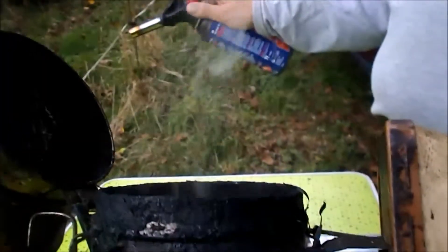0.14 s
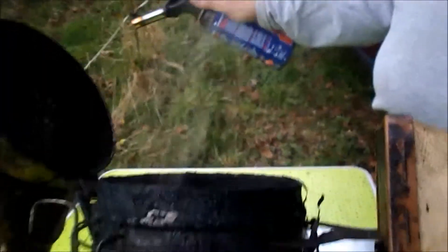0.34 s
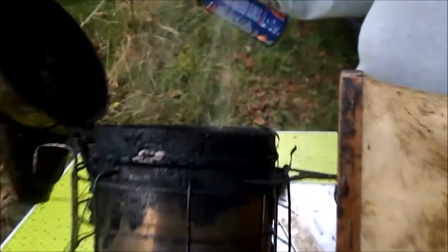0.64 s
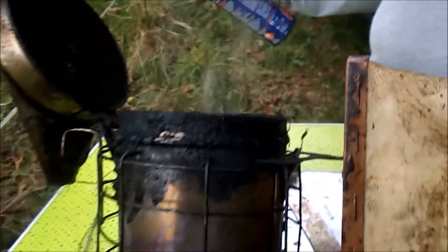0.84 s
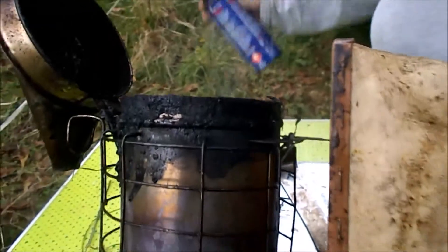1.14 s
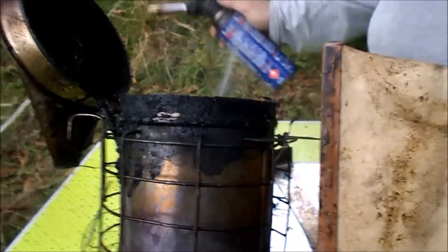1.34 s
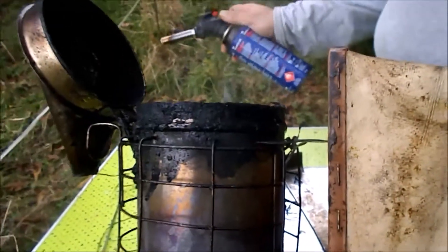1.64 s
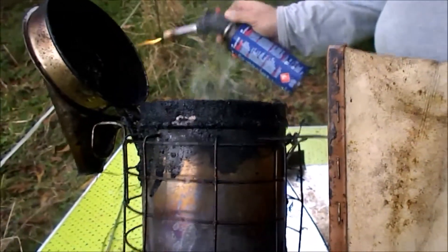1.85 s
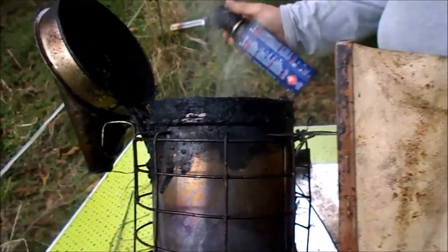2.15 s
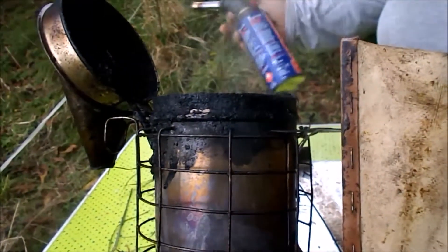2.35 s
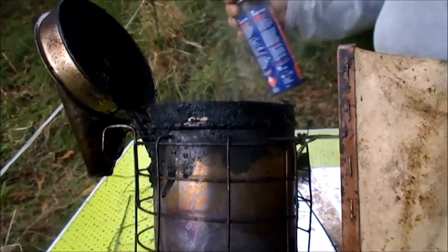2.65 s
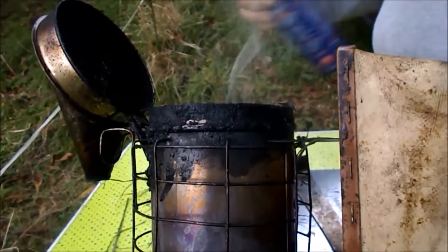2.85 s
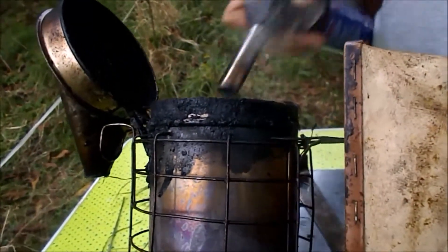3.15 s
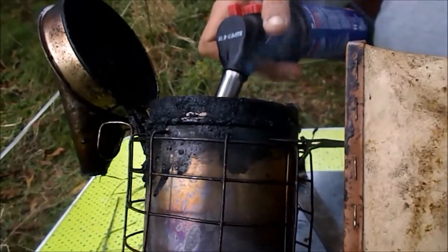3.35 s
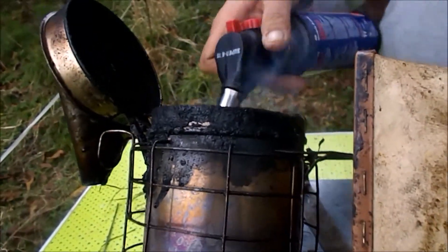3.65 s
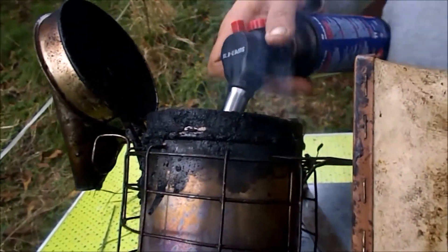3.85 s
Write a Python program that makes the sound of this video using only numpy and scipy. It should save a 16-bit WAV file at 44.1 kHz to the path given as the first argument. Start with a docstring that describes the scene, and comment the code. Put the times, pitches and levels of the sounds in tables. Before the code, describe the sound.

A gas blowtorch clicks, lights with a puff and roars into a metal can.

```python
"""A gas blowtorch in a quiet garden. First cloth rustles, the hand clicks and knocks on the torch,
and the igniter snaps. Near 2 s the valve spits and the gas lights with a double puff. The swirling
flame roars, with one more knock, and a nearby echo shifts its tone as the torch swings round.
Near 2.8 s the flame splashes on the rim of a metal can with a hollow sound. Then it sputters
into the can and roars inside. The garden rumbles and hisses softly all the way through."""
import sys
import numpy as np
from scipy import signal
from scipy.fft import rfft, irfft
from scipy.io import wavfile
from scipy.ndimage import map_coordinates

SR = 44100
rng = np.random.default_rng(int(sys.argv[2]) if len(sys.argv) > 2 else 0)


def wav_out(sig):
    """Save sig, one row per channel (or a flat mono array), as 16-bit PCM at SR to the path in sys.argv[1]."""
    wavfile.write(sys.argv[1], SR, np.round(np.clip(np.atleast_2d(sig).T, -1, 1) * 32767).astype(np.int16))


N = 176400

# How loud the flame's four bands are: time_s, roar_db, middle_db, hiss_db, top_db
FLAME_LEVELS = [(2.04, -41, -46, -46.5, -63), (2.18, -43.5, -46, -47, -65), (2.318, -39.5, -45, -49.5, -62),
                (2.41, -47, -47.5, -47.5, -64), (2.508, -37.5, -45, -50, -63),
                (2.524, -41.5, -42.5, -45, -60.5), (2.672, -42, -41.5, -50, -58.5),
                (2.848, -44.5, -38, -46, -61), (2.89, -33, -29, -33.5, -53),
                (2.912, -32.5, -25, -30.5, -42), (3.022, -27.5, -25, -30.5, -42),
                (3.044, -32.5, -29, -37.5, -50), (3.082, -29, -29, -26, -41),
                (3.104, -34.5, -30.5, -35.5, -51), (3.186, -37, -43, -43.5, -53),
                (3.316, -31.5, -38.5, -49.5, -56.5), (3.354, -34.5, -43.5, -48, -58),
                (3.392, -30.5, -40.5, -48, -54.5), (3.47, -31.5, -38, -49, -63),
                (3.508, -28, -38.5, -50.5, -61), (3.638, -35, -41, -48, -60), (3.742, -29, -38, -50.5, -62),
                (3.862, -33, -37, -44.5, -58.5), (3.896, -29.5, -37, -45, -60),
                (3.972, -33.5, -36, -53.5, -61), (4.0, -32, -47, -51.5, -58)]
# The flame's tone in open air, on the rim and inside the can: pitch_hz, level_db
OPEN_AIR_TONE = [(18,-79), (30,-55), (59,-49), (171,-7.5), (210,-4), (379,1), (560,-13.5), (650, -8.5),
                 (818,-1), (1340,-5.5), (1700,-21.5), (2100,-21), (3130,-29.5), (3820,-23.5), (4300, -28.5),
                 (4900, -26.5), (5450,-26.5), (6000, -33), (6500,-42), (7700,-31.5), (9400,-45),
                 (10700,-39.5), (11400,-60)]
RIM_TONE = [(18,-84), (30,-78), (124,-19.5), (288,-3.5), (473,-20), (563,-7), (800,6), (1100,-4.5),
            (1600,-8.5), (2160,-14.5), (2980,-11.5), (5830,-14.5), (6930,-29), (7660,-20.5), (11400,-24)]
IN_CAN_TONE = [(18,-82), (30,-73), (96,-24), (203,-3.5), (360,0.5), (638,-10.5), (759,-21), (950,-12.5),
               (1280,-14), (1490,-21.5), (1640,-40.5), (1850, -35), (2150,-25), (2470,-36.5), (2800, -24),
               (3100, -38), (3400,-27.5), (4050,-42), (4500, -31.5), (4900, -36), (5540,-26), (6400,-50),
               (7800,-35.5), (9000,-50), (10600,-40.5), (11400,-62)]
# The flame sputters as it enters the can: time_s, boost_db
SPUTTERS = [(2.802, 5), (2.852, 8), (3.098, 6), (3.115, 4.5), (3.133, 8), (3.152, 9)]
# The echo off a nearby surface: time_s, delay_ms, strength (0 to 1)
ECHO_PATH = [(2.0, .39, .8), (2.5, .40, .8), (2.75, .54, .8), (2.9, .67, .8), (3.05, .88, .7),
             (3.18, 1.0, .5), (3.3, 1.0, .0)]
# The hollow sound as the flame passes the rim: time_s, level_db
HOLLOW_LEVELS = [(2.62, -61), (2.75, -63), (2.86, -50), (2.91, -37), (2.98, -42), (3.05, -51), (3.12, -69)]
# The gas catches fire: start_s, level_db, length_s
PUFFS = [(1.974, -20.5, 0.035), (2.009, -26, .016)]
# The tone of a puff: pitch_hz, level_db
PUFF_TONE = [(18, -58.5), (30, -35), (398, 0.5), (523, -9), (1380, -10), (1900, -24.5), (2210, -19.5),
             (3920, -26), (10600, -46), (11400, -53), (14800, -85), (22000, -120)]
# The hand knocks on the gas can: start_s, level_db
KNOCKS = [(0.906, -31.5), (1.476, -37.5), (1.604, -35.5), (2.323, -26)]
# The notes the gas can rings with: pitch_hz, level_db, ring_s
GAS_CAN_NOTES = [(614, 23, 0.024), (563, -6, .02), (820, -2, 0.027)]
# Trigger, igniter and fittings click: start_s, peak_db, rattle_s, rattle_db, brightness_db_per_octave
CLICKS = [(.0445, -43, .006, -8, 16), (.113, -46, .004, -25, 2), (.131, -44, .004, -25, 0),
          (.153, -36, .01, -15, -2), (.349, -40, .006, -12, 3), (.4165, -32, .004, -25, 3),
          (.707, -49, .005, -8, 4), (.765, -45, .004, -8, 1), (.981, -47, .008, -6, 1),
          (1.018, -33, .012, -2, -3), (1.031, -42, .025, 0, -2), (1.228, -49, .06, -6, 3),
          (1.4475, -33, .02, -20, -2), (1.587, -50, .008, -8, 0)]
# The notes the trigger parts ring with: pitch_hz, level_db, ring_s
TRIGGER_NOTES = [(2200, -14, .006), (3280, 1, .022), (3700, -3, .005), (4150, -2, .006), (4700, -2, .007),
                 (5400, -3, .005), (6100, -5, .005), (7700, -15, .004), (9300, -17, .004),
                 (10800, -17, .004)]
# How loud the cloth is: time_s, high_part_db, low_part_db
RUSTLE_LEVELS = [(0.0, -68, -82), (0.036, -58, -65), (0.124, -64.5, -62), (0.148, -51, -64),
                 (0.212, -51.5, -54), (0.216, -53, -62), (0.27, -41, -48), (0.28, -46.5, -59),
                 (0.294, -46.5, -42), (0.326, -67, -79), (0.334, -54, -48), (0.34, -51, -73)]
# The tone of the cloth's high part: pitch_hz, level_db
CLOTH_TONE = [(1120, -54), (1900, -16.5), (2340, -22), (2700, -12), (5270, -13), (6120, -13), (7060, -27.5),
              (10600, -23.5), (11400, -41), (14800, -64), (22000, -120)]
# The tone of the garden: pitch_hz, level_db
GARDEN_TONE = [(12, -71), (20, -36), (75, -5.5), (308, -2.5), (343, -5), (381, -2), (424, -2.5),
               (471, -2.5), (702, -8), (915, -8), (2260, -16.5), (4270, -18.5), (11400, -42.5),
               (14800, -69), (22000, -120)]
# Narrow dips in the microphone's treble: pitch_hz, width_hz, depth (0 to 1)
TREBLE_DIPS = [(7030, 900, .97), (8530, 700, .97), (10030, 700, .97)]

TO_RIM_S, TO_CAN_S = (2.78, 2.9), (3.1, 3.25)   # when each move of the torch starts and ends
BAND_EDGES_HZ = (0, 620, 1600, 6900, SR)
LUMPS_DB, LUMPS_HZ, SHIMMER_DB, SHIMMER_HZ = 0.5, 37, 1.5, 21
SPUTTER_S, SNAP_S = 0.0028, 0.00061
ECHO_SHIFT_CYCLES, ECHO_TOP_HZ = 0.2, 4000
BOUNCE_S, BOUNCE_DB = 0.014, -11


def flame():
    """Swirling, burning gas makes uneven noise whose tone follows where the flame points."""
    t = np.arange(N) / SR
    rim, can = np.interp(t, TO_RIM_S, [0, 1]), np.interp(t, TO_CAN_S, [0, 1])
    places = [(1 - rim, OPEN_AIR_TONE), (rim * (1 - can), RIM_TONE), (can, IN_CAN_TONE)]
    lumps_db = LUMPS_DB * drift(LUMPS_HZ)   # all bands swell together
    sputter_db = sum(db * np.exp(-((t - s) / SPUTTER_S) ** 2) for s, db in SPUTTERS)
    out = np.zeros(N)
    for level_db, low_hz, high_hz in zip(curves(FLAME_LEVELS), BAND_EDGES_HZ, BAND_EDGES_HZ[1:]):
        band = sum(np.sqrt(share) * colour(noise(), tone, low_hz, high_hz) for share, tone in places)
        flicker = amp(lumps_db + SHIMMER_DB * drift(SHIMMER_HZ))
        gain = amp(level_db + sputter_db * (low_hz > 0))   # the lowest band does not sputter
        out += gain * rms_one(band * flicker)
    lit = np.clip((t - PUFFS[1][0]) / 0.0055, 0, 1)   # the flame starts with the second puff
    return add_echo(out) * lit


def add_echo(sound):
    """A duller echo boosts some pitches and cancels others; they slide down as its delay grows."""
    delay_ms, strength = curves(ECHO_PATH)
    hz = np.arange(N // 2 + 1) * SR / N
    shifted = rfft(sound) * np.exp(2j * np.pi * ECHO_SHIFT_CYCLES)
    dull = irfft(shifted / (1 + (hz / ECHO_TOP_HZ) ** 3), N)
    late = map_coordinates(dull, [np.arange(N) - delay_ms * SR / 1000], order=3)
    return (sound + strength * late) / np.sqrt(1 + strength ** 2)


def hollow_rim(width_hz=220):
    """At the rim, a narrow band of noise follows one of the falling pitches that the echo boosts."""
    delay_ms, _ = curves(ECHO_PATH)
    pitch_hz = (2 + ECHO_SHIFT_CYCLES) * 1000 / delay_ms
    phase = 2 * np.pi * np.cumsum(pitch_hz) / SR
    level_db = curves(HOLLOW_LEVELS, left=-120, right=-120)[0]
    return amp(level_db) * (drift(width_hz) * np.cos(phase) + drift(width_hz) * np.sin(phase))


def lighting_puffs():
    """The gas catches in two puffs; each swells and stops in a few hundredths of a second."""
    t = np.arange(N) / SR
    swell = np.zeros(N)
    for start_s, level_db, length_s in PUFFS:
        progress = np.clip((t - start_s) / length_s, 0, 1)
        swell += amp(level_db - 7) * np.sin(np.pi * progress ** 1.46)
    return swell * colour(noise(), PUFF_TONE)


def valve_spit(start_s=1.931, level_db=-46, rise_s=0.0055):
    """The valve spits gas: a bright hiss that rises fast and fades."""
    age = np.maximum(np.arange(N) / SR - start_s, 0) / rise_s
    hiss = colour(noise(), [(2000, 0), (8000, 0)], low_hz=3200, high_hz=6200)
    return amp(level_db) * age * np.exp(1 - age) * hiss


def hand_knocks():
    """Each soft knock and its weaker bounce make the gas can ring dully."""
    hits = np.zeros(N)
    for start_s, level_db in KNOCKS:
        hits[int(start_s * SR)] = amp(level_db)
        hits[int((start_s + BOUNCE_S) * SR)] = amp(level_db + BOUNCE_DB)
    keep_middle = signal.butter(2, [400, 1500], "band", fs=SR, output="sos")
    return signal.sosfilt(keep_middle, strike(hits, GAS_CAN_NOTES))


def trigger_clicks():
    """A sharp snap and a short rattle set the trigger parts ringing, a little differently each time."""
    out, age_s = np.zeros(N), np.arange(SR // 8) / SR
    for start_s, peak_db, rattle_s, rattle_db, brightness in CLICKS:
        snap = np.exp(-age_s / SNAP_S)
        rattle = amp(rattle_db - 20 * age_s / rattle_s)
        push = rng.standard_normal(len(age_s)) * (snap + rattle)
        notes = [(hz, db + brightness * np.log2(hz / 4000) + rng.normal(0, 0.83), ring_s)
                 for hz, db, ring_s in TRIGGER_NOTES]
        click = strike(push, notes)
        first = int(start_s * SR)
        out[first:first + len(click)] += amp(peak_db) * click / np.abs(click).max()
    return out


def thin_ringing(start_s=0.308, end_s=0.418, pitch_hz=3640, level_db=-60):
    """One faint, wavering note hangs on among the early clicks."""
    t = np.arange(N) / SR
    sounding = (t > start_s) & (t < end_s)
    return amp(level_db + 2 * drift(30)) * np.sin(2 * np.pi * pitch_hz * t) * sounding


def cloth_rustle(ticks_per_s=8300, uneven_db=2):
    """Rubbing fibres make thousands of tiny, uneven ticks."""
    ticks = (rng.random(N) < ticks_per_s / SR) * rng.standard_normal(N)
    ticks *= amp(uneven_db * np.minimum(rng.exponential(1, N), 4))
    high_db, low_db = curves(RUSTLE_LEVELS, right=-120)
    high = colour(ticks, CLOTH_TONE, low_hz=1900)
    low = colour(ticks, [(500, -9.5), (2000, -7.5)], low_hz=620, high_hz=1580)
    return amp(high_db) * high + amp(low_db) * low


def garden(level_db=-54, waver_db=0.22):
    """A soft, far rumble and the hiss of leaves."""
    return amp(level_db) * colour(noise() * amp(-waver_db * drift(2)), GARDEN_TONE)


def noise():
    return rng.standard_normal(N)


def amp(db):
    """Turns decibels into a number to multiply by."""
    return 10 ** (np.asarray(db) / 20)


def rms_one(sound):
    """Scales a sound to an average strength (rms) of 1."""
    return sound / np.sqrt(np.mean(sound ** 2) + 1e-20)


def curves(rows, **ends):
    """Joins a table's points in time: one curve for each column after time_s."""
    time_s, *columns = np.transpose(rows)
    return [np.interp(np.arange(N) / SR, time_s, column, **ends) for column in columns]


def colour(sound, tone, low_hz=0, high_hz=SR):
    """Gives a sound a tone and keeps one soft-edged band of it, at strength 1."""
    hz = np.arange(1, N // 2 + 2) * SR / N
    pitch_hz, level_db = np.transpose(tone)
    gain = amp(np.interp(np.log(hz), np.log(pitch_hz), level_db))
    band = 1 / np.sqrt((1 + (low_hz / hz) ** 16) * (1 + (hz / high_hz) ** 16))
    return rms_one(irfft(rfft(sound) * gain * band, N))


def drift(speed_hz):
    """A smooth random wobble of strength 1, worked out at every tenth sample."""
    decay = np.exp(-2 * np.pi * speed_hz / (SR / 10))
    steps = rng.standard_normal(N // 10 + 4002)
    slow = signal.lfilter([1], [1, -2 * decay, decay ** 2], steps)[4000:]
    return np.interp(np.arange(N) / 10, np.arange(len(slow)), rms_one(slow))


def strike(hits, notes):
    """A struck object rings with all its notes at once; each fades by 60 dB in its ring_s."""
    out = 0
    for hz, db, ring_s in notes:
        decay, angle = amp(-60 / (ring_s * SR)), 2 * np.pi * hz / SR
        feedback = [1, -2 * decay * np.cos(angle), decay ** 2]
        out += amp(db) * signal.lfilter([0, np.sin(angle)], feedback, hits + 1e-18)
    return out / sum(amp(db) for _, db, _ in notes)


def scene():
    """Adds the torch, the handling and the garden into one channel."""
    torch = flame() + hollow_rim() + lighting_puffs() + valve_spit()
    handling = hand_knocks() + trigger_clicks() + thin_ringing() + cloth_rustle()
    return (torch + handling + garden())[None]


def record(dry, cutoff_hz=11260, hiss_db=-99):
    """Makes narrow dips in the treble, cuts off the very top and adds a faint hiss."""
    for hz, width_hz, depth in TREBLE_DIPS:
        b, a = signal.iirpeak(hz, hz / width_hz, fs=SR)
        dry = dry - depth * signal.lfilter(b, a, dry)
    cut_top = signal.ellip(12, .5, 80, cutoff_hz, fs=SR, output="sos")
    return signal.sosfilt(cut_top, dry) + amp(hiss_db) * rng.standard_normal(dry.shape)


dry = scene()
out = record(dry)
wav_out(out)
```